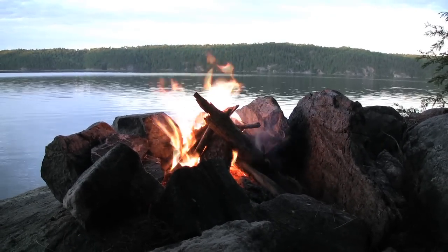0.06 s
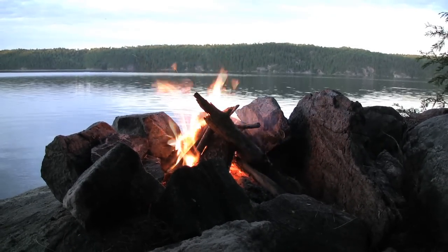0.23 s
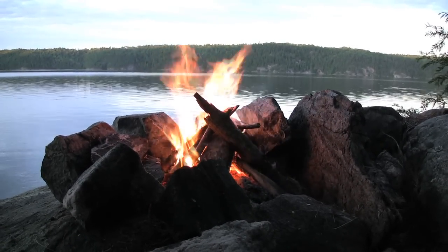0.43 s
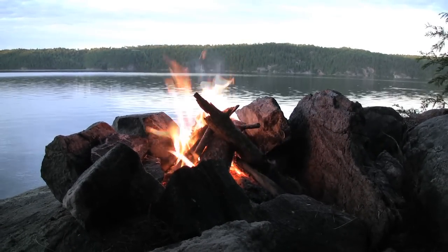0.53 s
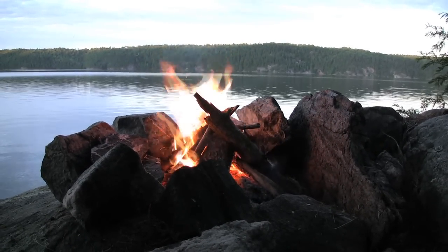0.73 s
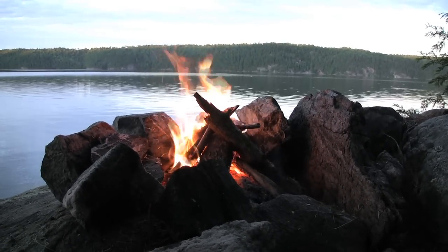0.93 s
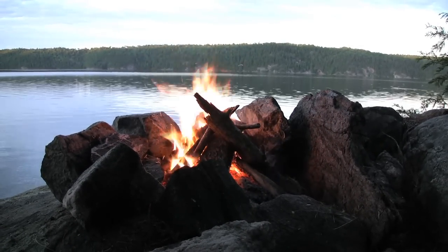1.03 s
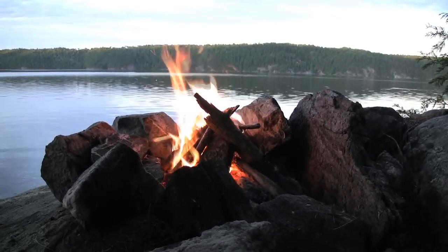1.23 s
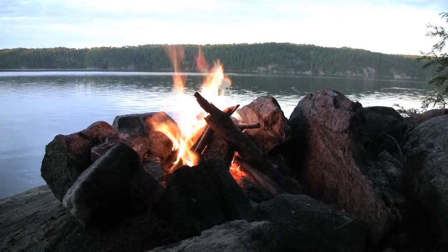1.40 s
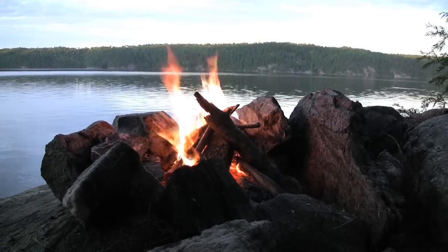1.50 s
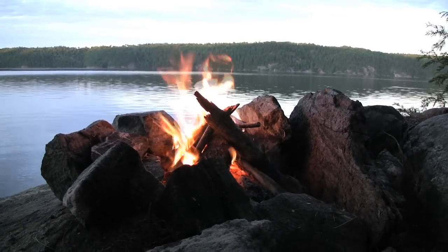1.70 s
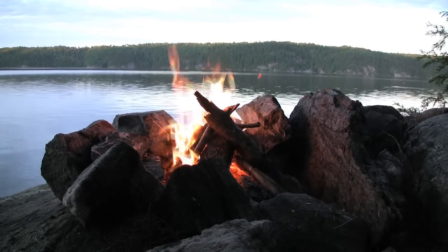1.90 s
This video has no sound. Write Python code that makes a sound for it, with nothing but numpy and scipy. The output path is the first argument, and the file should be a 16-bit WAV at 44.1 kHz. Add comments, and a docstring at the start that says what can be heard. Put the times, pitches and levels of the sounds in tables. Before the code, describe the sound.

A wood fire snaps and pops brightly at close range, with faint ticking embers and quiet hiss

```python
"""Sharp pops burst from a small campfire in a ring of rocks on a still lake shore, over a thin hiss and hum.
Gas pockets burst in the wood: each is a puff of pressure and a snap of fibres, made from filtered clicks.
Logs and rocks scatter the crackle and the trees answer faintly, as dying clouds of small echoes.
Now and then a stick rings with fading tones; embers tick at random and flames flutter as soft low noise."""
import sys
import numpy as np
from scipy import signal
from scipy.fft import rfft, irfft
from scipy.io import wavfile

SR = 44100
rng = np.random.default_rng(int(sys.argv[2]) if len(sys.argv) > 2 else 0)


def to_wav(sig):
    """Store sig (one row per channel, or 1-D mono) as 16-bit WAV at the path in sys.argv[1].

    Samples outside -1..1 are clipped; the rate is SR.
    """
    pcm = np.clip(np.atleast_2d(sig), -1, 1) * 32767
    pcm = np.round(pcm).astype(np.int16)
    wavfile.write(sys.argv[1], SR, pcm.T)  # frames by channels


N = 85995  # length of the scene in samples
TINY = 1e-18  # inaudible offset that keeps filters from working on vanishingly small numbers


def from_db(db):
    """Turn decibels into a plain amplitude factor."""
    return 10 ** (np.asarray(db) / 20)


def cut(x, hz, kind, order=2):
    """Keep only part of the frequency range, with a smooth Butterworth filter."""
    safe_hz = np.clip(hz, 10, 0.47 * SR)
    sos = signal.butter(order, safe_hz, kind, fs=SR, output="sos")
    return signal.sosfilt(sos, x)


def add(out, start_s, sound):
    """Mix a sound in at a time, dropping whatever runs past the end."""
    i = max(int(start_s * SR), 0)
    out[..., i:i + sound.shape[-1]] += sound[..., :N - i]


def stereo_noise(side_db, size):
    """White noise shared by both channels, plus a left-right difference at side_db beside it."""
    mid, side = rng.standard_normal((2, size))
    return mid + from_db(side_db) * side * [[1], [-1]]


def coloured_noise(spectrum, side_db):
    """Stereo noise shaped to a given spectrum, with an overall rms of 1."""
    top_hz = 15900  # nothing above this
    point_hz, point_db = np.transpose(spectrum)
    f = np.arange(N // 2 + 1) * SR / N
    gain_db = np.interp(np.log(f + 1), np.log(point_hz), point_db)
    gain = from_db(gain_db) * (f < top_hz)
    noise = irfft(rfft(stereo_noise(side_db, size=N)) * gain, N)
    return noise / noise.std()


def reflections(x, delay_s, t60_s, energy_db, low_hz, high_hz, side_db):
    """A dying cloud of small echoes of x: filtered noise that falls 60 dB in t60_s."""
    t = np.arange(SR // 3) / SR
    noise = cut(stereo_noise(side_db, size=len(t)), [low_hz, high_hz], "band", order=1)
    cloud = noise * from_db(-60 * t / t60_s)
    # set the echo energy, averaged over the two channels
    cloud *= from_db(energy_db) / np.sqrt(np.sum(cloud ** 2) / 2)
    delay = max(int(delay_s * SR), 0)
    cloud = np.pad(cloud, ((0, 0), (delay, 0)))
    return signal.fftconvolve(np.atleast_2d(x), cloud, axes=1)[:, :x.shape[-1]]


def among_logs(x, scatter_db):
    """Logs scatter each sound in their own way: a fresh, very short echo cloud every time."""
    return x + reflections(x, delay_s=0.0003, t60_s=0.0071, energy_db=scatter_db,
                           low_hz=1700, high_hz=13000, side_db=-21)


def background():
    """Even hiss from shaped noise, and a faint motor-like hum from a few steady tones."""
    hiss_db, hiss_side_db = -66.5, -0.6
    # How the hiss is spread over pitch. Each row: frequency in Hz, relative level in dB.
    hiss_spectrum = [(30, 6), (110, 3.5), (280, 1.5), (1000, -0.5), (2500, 0), (7000, 0), (11000, -1.2),
                     (15000, -1)]
    # The tones of the hum. Each row: frequency in Hz, rms level in dB.
    hum_tones = [(29.8, -77), (60, -82), (119.8, -88.5)]
    t = np.arange(N) / SR
    hum = np.zeros(N)
    for hz, db in hum_tones:
        peak = np.sqrt(2) * from_db(db)
        hum += peak * np.sin(2 * np.pi * (hz * t + rng.random()))
    return hum + from_db(hiss_db) * coloured_noise(hiss_spectrum, hiss_side_db)


def flames():
    """A soft low rush that flutters as the flames lick and swells as they flare."""
    flame_db, side_db = -72.5, -25
    flutter_db, flutter_hz = 3, 18  # rms size of the level wander, and its fastest rate
    flare_s = 0.013  # time from the peak until the dB rise has shrunk to 1/e
    # How the rush is spread over pitch. Each row: frequency in Hz, relative level in dB.
    flame_spectrum = [(20, -6.5), (45, -8.5), (100, -8), (180, -2.5), (280, 1.5), (400, -4), (590, -12),
                      (950, -16), (1800, -21), (4000, -30.5)]
    # Brief flares of the flames. Each row: time of the peak in seconds, rise in dB.
    flares = [(.075, 6), (.497, 6.5), (.632, 5), (.815, 6.5), (1.155, 12.5), (1.632, 6.5), (1.653, 8)]
    t = np.arange(N) / SR
    # the first second is dropped so the slow filter has settled
    flutter = cut(rng.standard_normal(N + SR), flutter_hz, "low")[SR:]
    flutter = flutter_db * flutter / flutter.std()
    flare_db = sum(db * np.exp(-((t - s) / flare_s) ** 2) for s, db in flares)
    level = from_db(flame_db + flare_db + flutter)
    return level * coloured_noise(flame_spectrum, side_db)


def pops():
    """Each gas burst is one rounded pressure pulse and one sharp fibre snap of opposite sign."""
    # The bursts. Each row: start in seconds, puff level in dB, puff upper edge in Hz,
    # puff lower edge in Hz, snap level in dB, snap centre in Hz,
    # snap band spread as a ratio either side of the centre, scatter energy in dB.
    # Puff and snap levels are those of the clicks before filtering.
    bursts = [(0.01, -8, 2100, 1180, -23, 9400, 1.76, -6.5),
              (0.0353, -4.4, 1950, 1970, -19, 9000, 1.55, -4.5),
              (0.0504, -3, 2270, 1120, -19, 8300, 1.6, -13),
              (0.1967, -2.5, 2740, 408, -8.5, 6100, 1.53, -7),
              (.2339, 12, 4500, 1220, 7.5, 8100, 1.5, -11.5), (0.2438, 2.5, 3980, 1100, 5, 8460, 1.5, -7),
              (.4318, 4.5, 2210, 3700, -17.5, 10600, 1.55, -11),
              (0.4802, -33, 2180, 1200, -42, 7000, 1.6, -8),
              (0.5569, -30.5, 1800, 1200, -52, 7000, 1.8, -7),
              (0.607, -1, 2100, 3260, -16.5, 8900, 1.42, -5),
              (0.6423, 2, 1830, 3200, -24.5, 9300, 1.75, -8),
              (.6690, -15.5, 1430, 1250, -48, 6640, 1.6, -12),
              (0.7353, 14, 1860, 2810, 10.5, 7480, 1.405, -9.5),
              (.7555, -35, 4000, 1500, -34, 7500, 1.4, -14), (0.7676, -23, 4000, 1300, -23, 8000, 1.45, -7),
              (.9145, 1, 2540, 452, -4.5, 6700, 1.49, -4.5),
              (.9236, -21.5, 2970, 301, -27.5, 8500, 1.9, -6.5),
              (.9620, -29.5, 3600, 950, -25, 8200, 1.5, 0.5),
              (.9882, -27.5, 1980, 400.5, -52, 6000, 1.6, -2),
              (1.0119, -17, 2920, 1190, -45, 8000, 1.6, -5.5),
              (1.1419, -18.5, 1900, 250, -39.5, 9860, 1.6, -14),
              (1.2540, -6.5, 3050, 850, -9.5, 8060, 1.55, -8.5),
              (1.4971, -33, 3000, 1500, -27, 9000, 1.5, -10),
              (1.5013, 4.5, 2250, 1120, -11, 8600, 1.41, -6.5),
              (1.5520, -4.5, 1810, 1820, -18.5, 7830, 1.48, -7),
              (1.6594, -28.5, 3280, 2000, -41, 6800, 1.64, -7.5),
              (1.7749, -13, 1650, 1470, -46, 9000, 1.8, -13),
              (1.8062, -1.5, 2630, 1100, -7.5, 7000, 1.51, -6),
              (1.8929, -21, 2600, 500, -22, 12000, 1.64, -11.5)]
    out = np.zeros((2, N))
    click = signal.unit_impulse(SR // 20) + TINY
    for s, puff_db, top_hz, low_hz, snap_db, snap_hz, spread, scatter_db in bursts:
        rounded = cut(click, top_hz, "low", order=3)
        puff = from_db(puff_db) * cut(rounded, low_hz, "high", order=1)
        snap = from_db(snap_db) * cut(click, [snap_hz / spread, snap_hz * spread], "band")
        burst = cut(puff - snap, [190, 13800], "band")  # trim bass and treble
        add(out, s, among_logs(burst, scatter_db))
    # the pops are a little hollow in the low mids
    low_mids = cut(out + TINY, (400, 570), "band", order=1)
    return out - 0.48 * low_mids


def embers():
    """Faint dull ticks: single clicks of varied size at random moments, filtered to a band."""
    ticks_per_s, tick_db, spread_db = 30, -43.5, 2.5  # levels before filtering
    born = rng.random(N) < ticks_per_s / SR
    variation = np.clip(rng.standard_normal(N), -2, 2)
    sizes = from_db(tick_db + spread_db * variation)
    return cut(born * sizes + TINY, (600, 3000), "band")


def sticks():
    """A stick cracks: a small click sets each of its short modes ringing as a fading tone."""
    # The ringing modes. Each row: start in seconds, ring frequency in Hz, ring starting level in dB,
    # time in seconds for the ring to fall 60 dB, click level in dB before filtering.
    modes = [(0.3229, 2460, -48.5, 0.014, -32.5), (0.3227, 3580, -47, 0.0075, -39),
             (1.6476, 3020, -53, 0.0046, -47), (1.6491, 2060, -43.5, 0.011, -43)]
    out = np.zeros((2, N))
    t = np.arange(SR // 20) / SR
    for s, hz, ring_db, t60_s, click_db in modes:
        ring = from_db(ring_db - 60 * t / t60_s) * np.sin(2 * np.pi * hz * t)
        impulse = signal.unit_impulse(len(t))
        click = from_db(click_db) * cut(impulse, [hz, 9000], "band", order=1)
        add(out, s, among_logs(ring + click, scatter_db=-6.5))
    return out


def scene():
    """The fire with its echoes from the rock ring and the trees, over flames, hiss and hum."""
    # Echoes from the rocks and from the trees. Each lists: delay in seconds (below zero counts as zero),
    # time in seconds to fall 60 dB, energy in dB, lower edge in Hz, upper edge in Hz,
    # left-right difference in dB.
    rock_echo = (-0.0138, 0.04, -24.5, 301.5, 5999.5, -19.5)
    tree_echo = (-0.13, .25, -33.5, 2400, 13500.5, -13)
    crackle = pops() + embers() + sticks()
    echoes = reflections(crackle, *rock_echo) + reflections(crackle, *tree_echo)
    return background() + flames() + crackle + echoes


def record(dry):
    """The input overloads, clipping anything beyond full scale; then the top is cut steeply."""
    clipped = np.clip(dry, -1, 1)
    # at least 80 dB down from 17200 Hz upward
    top_cut = signal.cheby2(18, 80, 17200, fs=SR, output="sos")
    return signal.sosfilt(top_cut, clipped)


dry = scene()
out = record(dry)
to_wav(out)
```